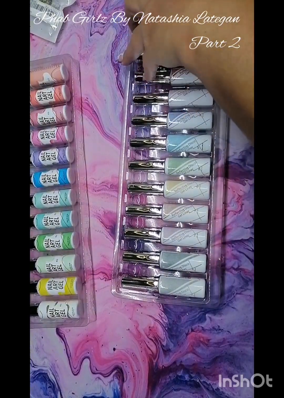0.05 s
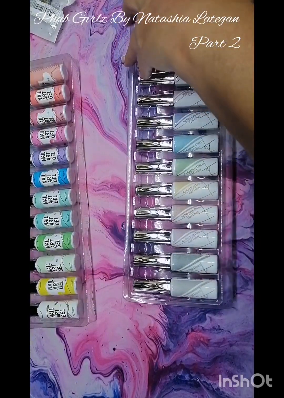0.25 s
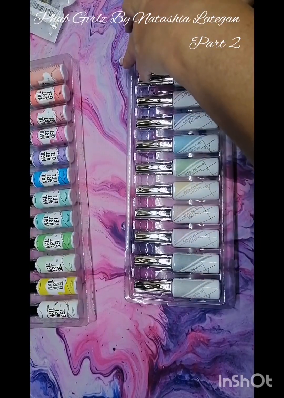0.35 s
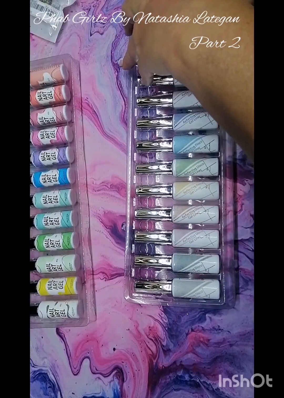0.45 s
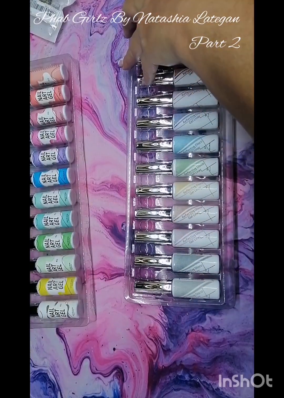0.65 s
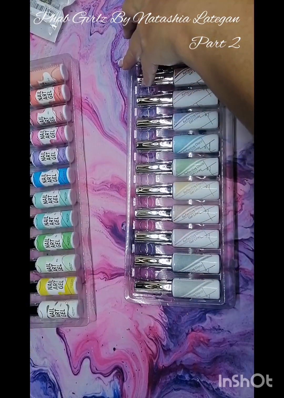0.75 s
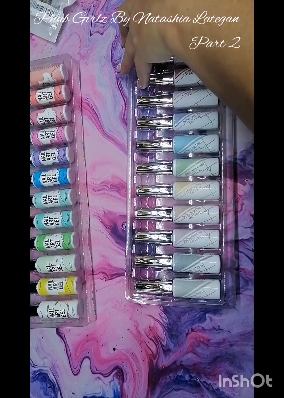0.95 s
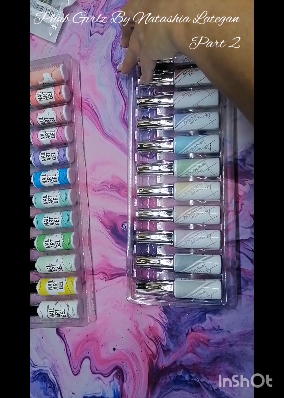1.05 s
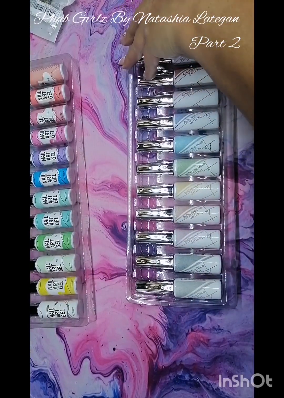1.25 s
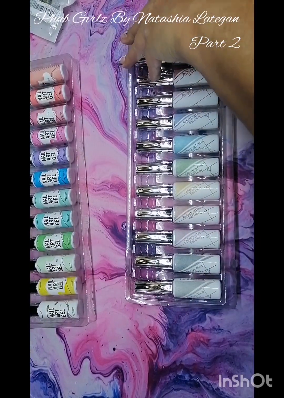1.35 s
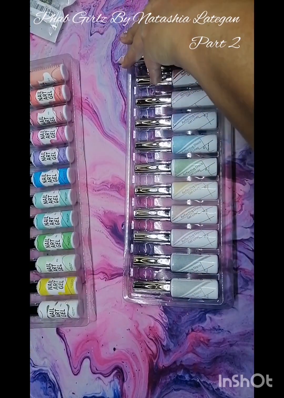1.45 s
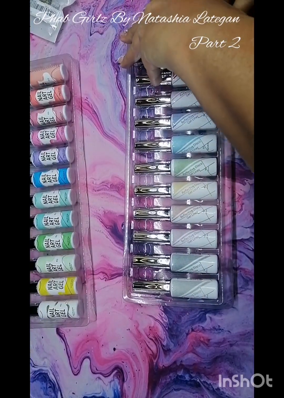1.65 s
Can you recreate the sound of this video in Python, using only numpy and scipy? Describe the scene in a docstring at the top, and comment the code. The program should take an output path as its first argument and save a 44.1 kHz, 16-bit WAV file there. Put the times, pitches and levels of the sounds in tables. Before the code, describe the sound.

A thin plastic tray crinkles and clicks close by, slightly left, in a small quiet room. Light crackle starts at once; at 0.23 s a hollow bottle tap and low table knock lead into dense rustling and clacks until 0.5 s. Brief ticks come near 0.8 s, then near quiet. From 1.05 s crinkles return, with taps around 1.3 and a sharp click at 1.4, fading in faint rustles by 1.65.

```python
"""At a table in a small quiet room, a hand works small bottles loose from a thin plastic tray,
left of a pair of microphones. The buckling plastic ticks and crinkles: short bursts of coloured noise.
Bottles tap and rub its pockets and walls, and it knocks the table, which booms: clicks and noise
drive ringing modes. The hand's push adds a low rumble, the air a steady noise, and the room answers."""
import sys
import numpy as np
from scipy import signal
from scipy.fft import rfft, irfft, next_fast_len
from scipy.io import wavfile

SR = 44100
rng = np.random.default_rng(int(sys.argv[2]) if len(sys.argv) > 2 else 0)


def volts_from_db(level):
    """Convert decibel levels to linear amplitude ratios."""
    exponent = np.asarray(level, float) / 20
    return 10 ** exponent


def to_wav(sig):
    """Store sig (one row per channel, or 1-D mono) as 16-bit WAV at the path in sys.argv[1].

    Samples outside -1..1 are clipped; the rate is SR.
    """
    pcm = np.clip(np.atleast_2d(sig), -1, 1) * 32767
    pcm = np.round(pcm).astype(np.int16)
    wavfile.write(sys.argv[1], SR, pcm.T)  # frames by channels


N = 74970

# The pull on the tray. Each row: time in seconds, crinkle level in dB, level in dB of bottles
# rubbing in their pockets, level in dB of the push on the table.
PULL_CURVE = [(0, -53.5, -79.5, -67), (0.113, -70, -68.5, -63.5), (0.15, -48, -54.5, -56),
              (0.22, -55, -65, -66.5), (0.262, -44.5, -44.5, -55), (0.316, -68, -70.5, -50.5),
              (.34, -49, -45.5, -61.5), (0.438, -46.5, -48.5, -56), (0.534, -54, -54, -65),
              (0.57, -75, -72, -69), (0.743, -81, -74.5, -63), (0.8, -47.5, -75, -65.5),
              (.85, -77.5, -70.5, -67.5), (1.01, -77.5, -70.5, -65.5), (1.057, -54, -67, -59),
              (1.116, -78, -75, -63), (1.182, -49.5, -60.5, -58), (1.232, -59, -65.5, -70),
              (1.269, -47, -51, -64.5), (1.348, -57, -56, -61.5), (1.389, -79, -69, -67),
              (1.408, -50, -59.5, -62.5), (1.522, -65.5, -60.5, -85), (1.564, -63, -72, -77),
              (1.627, -59, -63.5, -95), (1.66, -76, -107, -100)]
# Bottles tapping the tray. Each row: start in seconds, strength in dB of the crack, of the blow
# on the walls and of the blow on the pocket, pitch of that pocket in Hz.
BOTTLE_TAPS = [(0.2296, -29, -32.5, -19.5, 866), (0.248, -43, -45, -30, 630),
               (0.3425, -28, -46, -38.5, 800), (0.3672, -49, -45, -32, 890), (0.3992, -61, -50, -29.5, 950),
               (0.4078, -55, -37, -29.5, 763), (0.4296, -39, -42, -27.5, 1136),
               (0.4395, -57, -35, -29, 1240), (0.4462, -45, -40.5, -31, 904), (0.4672, -24, -32, -36, 890),
               (1.2877, -45.5, -32.5, -28, 988), (1.337, -52, -45, -44, 825),
               (1.3455, -58, -43, -41.5, 816), (1.3976, -21.5, -31.5, -30, 1110),
               (1.5246, -53, -42.5, -47, 960), (1.583, -51, -57, -51, 890), (1.6175, -46.5, -63, -50, 990)]
# Short ticks, mostly of buckling plastic; the rows at 1.019 s and 1.4488 s are light bottle taps that ring no
# pocket of their own. Each row: start in seconds, strength in dB.
TICKS = [(0.0467, -39.5), (0.124, -47.5), (0.2453, -30.5), (0.2632, -35), (0.4966, -35.5),
         (0.5214, -44), (0.7634, -35), (0.7698, -34), (0.7858, -37), (0.794, -53), (0.8093, -43.5),
         (0.8642, -53), (1.019, -46.5), (1.051, -41.5), (1.175, -37.5), (1.2, -42), (1.2372, -44.5),
         (1.4488, -52.5), (1.5759, -44.5)]

GRAIN_SPREAD_DB = 2  # how uneven the crinkles and rubs are
TABLE_LEFT_DB = 6  # how much louder the table is on the left than on the right
AIR_ALIKE = 0.78  # share of the noise power that both sides have in common


def rms_one(x):
    """Scale to rms 1."""
    return x / np.sqrt(np.mean(x ** 2) + 1e-20)


def pull_db(column):
    """One column of the pull in dB, with straight lines between its points."""
    points = np.transpose(PULL_CURVE)
    return np.interp(np.arange(N) / SR, points[0], points[column])


def train(start_s, db):
    """Single clicks at the given times and levels."""
    clicks = np.zeros(N)
    clicks[(np.asarray(start_s) * SR).astype(int)] = volts_from_db(db)
    return clicks


def grains(per_s):
    """Random clicks of uneven size."""
    happens = rng.random(N) < per_s / SR
    return happens * volts_from_db(GRAIN_SPREAD_DB * np.minimum(rng.exponential(1, N), 4))


def dying(clicks, t60_s):
    """Every click opens an envelope that swells as the plastic gives, then dies away."""
    give_s = 0.0012
    give = np.exp(-1 / (give_s * SR))
    swell = signal.lfilter([1 - give], [1, -give], clicks + 1e-18)
    return 2 * signal.lfilter([1], [1, -volts_from_db(-60 / (t60_s * SR))], swell)


def pair(alike):
    """Two white noises, left and right, that share a part of their power."""
    shared, left, right = rng.standard_normal((3, N))
    return np.sqrt(alike) * shared + np.sqrt(1 - alike) * np.array([left, right])


def colour(x, points):
    """Shape a sound by a spectrum, answering early (minimum phase) and keeping white noise's power."""
    hz, db = np.transpose(points)
    size = 2 ** 12
    bins_hz = np.fft.rfftfreq(size, 1 / SR)
    log_gain = np.log(volts_from_db(np.interp(np.log(bins_hz + 1), np.log(hz), db)))
    # folding the cepstrum onto its first half makes the filter answer as early as it can
    fold = irfft(log_gain)
    fold[1:size // 2] *= 2
    fold[size // 2 + 1:] = 0
    kernel = rms_one(irfft(np.exp(rfft(fold)))) / np.sqrt(size)
    return signal.fftconvolve(x, kernel[None], axes=1)[:, :N]


def cut(x, hz, side):
    """Second-order filter: "low" keeps the sound below hz, "high" the sound above."""
    return signal.sosfilt(signal.butter(2, hz, side, fs=SR, output="sos"), x)


def ring(forces, modes):
    """Forces drive modes (Hz, dB, seconds to fall 60 dB) in turn; a unit click rings each at its level."""
    out = 0
    for k, (hz, db, t60_s) in enumerate(modes):
        radius = volts_from_db(-60 / (t60_s * SR))
        angle = 2 * np.pi * hz / SR
        drive = volts_from_db(db) * np.array([.5, 0, -.5])
        resonance = [1, -2 * radius * np.cos(angle), radius ** 2]
        out = out + signal.lfilter(drive, resonance, forces[k % len(forces)])
    return out


def struck(start_s, db, modes):
    """Each blow is a click and a short chatter; it reaches every mode with a strength of its own."""
    spread_db, chatter_db, chatter_t60_s, chatter_alike = 1.5, -18, 0.011, 0.81
    luck_db = rng.normal(0, spread_db, (len(start_s), len(modes)))
    forces = []
    for k in range(len(modes)):
        blow = train(start_s, db + luck_db[:, k])
        chatter = dying(blow, chatter_t60_s) * pair(chatter_alike)
        forces.append((-1) ** k * blow + volts_from_db(chatter_db) * chatter)
    return ring(forces, modes)


def balance(left_db):
    """Left and right gains that differ by left_db."""
    return volts_from_db(np.array([[left_db / 2], [-left_db / 2]]))


def place(x, left_db):
    """A sound from the left reaches the right microphone later and weaker."""
    right_lag_s = 0.00022
    left, right = np.broadcast_to(x, (2, N))
    delay = np.exp(-2j * np.pi * np.fft.rfftfreq(N, 1 / SR) * right_lag_s)
    late = np.fft.irfft(rfft(right) * delay, N)
    return np.array([left, late]) * balance(left_db)


def rubbing():
    """Bottles rub the plastic: two stereo streams of random clicks of either sign."""
    return [grains(350) * pair(0.24) for _ in range(2)]


def cracks():
    """Taps, ticks and dense crinkles crack in the treble: noise bursts that die in milliseconds."""
    # Spectrum of cracking plastic. Each row: frequency in Hz, relative level in dB per Hz.
    spectrum = [(2200, -9.5), (3200, 1.5), (3700, -8), (4600, -1), (6000, -2.5), (8300, -1), (11000, -7.5),
                (15000, -10.5), (16300, -32)]
    crack_t60_s, crinkle_t60_s, crinkles_per_s = 0.0052, 0.0064, 870
    tap_s, crack_db, _, _, _ = np.transpose(BOTTLE_TAPS)
    tick_s, tick_db = np.transpose(TICKS)
    single = dying(train(tap_s, crack_db) + train(tick_s, tick_db), crack_t60_s)
    crinkle = rms_one(dying(grains(crinkles_per_s), crinkle_t60_s)) * volts_from_db(pull_db(1))
    noise = (single + crinkle) * pair(0.17)
    return place(colour(noise, spectrum), left_db=2)


def walls():
    """Taps, faint ticks and rubbing ring the thin walls of the tray."""
    # Modes of the walls. Each row: frequency in Hz, level in dB, seconds to fall by 60 dB.
    modes = [(1653, -0.5, 0.0094), (2280, 8.5, 0.0051), (2773, 2.5, 0.008), (3210, -6, 0.015)]
    tick_wall_db, rub_wall_db = -44, -1  # how much of a tick, and of the rubbing, reaches the walls
    tap_s, _, wall_db, _, _ = np.transpose(BOTTLE_TAPS)
    tick_s, tick_db = np.transpose(TICKS)
    blows = struck(np.r_[tap_s, tick_s], np.r_[wall_db, tick_db + tick_wall_db], modes)
    # the rubbing follows the mean of the rub and crinkle levels
    rub_db = (pull_db(2) + pull_db(1)) / 2 + rub_wall_db
    rub = rms_one(ring(rubbing(), modes)) * volts_from_db(rub_db)
    return place(blows + rub, left_db=4)


def pockets():
    """Each tap rings one pocket at its own pitch; rubbing rings a set of pocket modes."""
    # Modes of the pockets. Each row: frequency in Hz, level in dB, seconds to fall by 60 dB.
    modes = [(517, 0, 0.0091), (748, -1, 0.018), (878, 1, 0.019), (1050, 1.5, 0.011)]
    tap_t60_s = 0.014
    sound = rms_one(ring(rubbing(), modes)) * volts_from_db(pull_db(2))
    for start_s, _, _, pocket_db, hz in BOTTLE_TAPS:
        sound = sound + struck([start_s], pocket_db, [(hz, 0, tap_t60_s)])
    return place(sound, left_db=7.5)


def table():
    """Soft knocks ring the table top; the sliding tray keeps its low modes stirring."""
    # Modes of the table top. Each row: frequency in Hz, level in dB, seconds to fall by 60 dB.
    modes = [(99, -2, 0.071), (156.5, 1, 0.16), (228, -1.5, 0.059), (287, 3.5, 0.0057), (403, -9.5, 0.087)]
    # The tray knocks the table. Each row: start in seconds, strength in dB.
    tray_knocks = [(0.2315, -36), (0.2485, -38.5), (1.0193, -44), (1.286, -46.5)]
    start_s, db = np.transpose(tray_knocks)
    knocks = cut(train(start_s, db), 574, "low")
    stir = rms_one(ring(rng.standard_normal((2, N)), modes)) * volts_from_db(pull_db(3))
    return place(ring([knocks], modes) + stir, TABLE_LEFT_DB)


def rumble():
    """The push of the hand shakes the stand that holds the microphones: low noise."""
    rumble_db = -7  # relative to the push
    low = rms_one(cut(pair(AIR_ALIKE), 98, "low"))
    return low * volts_from_db(pull_db(3) + rumble_db) * balance(TABLE_LEFT_DB)


def air():
    """The steady air of the room: coloured noise, a little louder on the right."""
    # Spectrum of the air. Each row: frequency in Hz, relative level in dB per Hz.
    spectrum = [(40, -2), (150, -6), (900, -6.5), (3300, -23), (14800, -34), (16300, -45)]
    air_db, left_db = -73, -3.5
    return volts_from_db(air_db) * colour(pair(AIR_ALIKE), spectrum) * balance(left_db)


def room(x):
    """Six feedback delays a side, duller on every round."""
    t60_s, wall_cut_hz = 0.18, 7900  # decay at low pitch; where the walls start to dull the sound
    size = next_fast_len(N + SR)
    hz = np.fft.rfftfreq(size, 1 / SR)
    echoes = np.zeros((2, len(hz)), complex)
    for k, lag_s in enumerate(rng.uniform(.006, 0.023, 12)):
        delay = np.exp(-2j * np.pi * hz * lag_s)
        loop = volts_from_db(-60 * lag_s / t60_s) * delay / (1 + 1j * hz / wall_cut_hz) ** .5
        # loop / (1 - loop) adds up all the rounds; sides alternate
        echoes[k % 2] += (-1) ** (k // 2) * loop / (1 - loop)
    return irfft(echoes * rfft(x.mean(0), size), size)[:, :N]


def scene():
    """Tray and table, too small to radiate deep bass, in the room, with its air and the rumble."""
    room_db = -15
    near = cut(cracks() + walls() + pockets() + table(), 110, "high")
    return near + volts_from_db(room_db) * room(near) + rumble() + air()


def roll_off(x):
    """The treble ends steeply here."""
    return signal.sosfilt(signal.butter(12, 16640, fs=SR, output="sos"), x)


def record(dry):
    """Put the finished mix through the last processing step and return the result."""
    return roll_off(dry)


dry = scene()
out = record(dry)
to_wav(out)
```